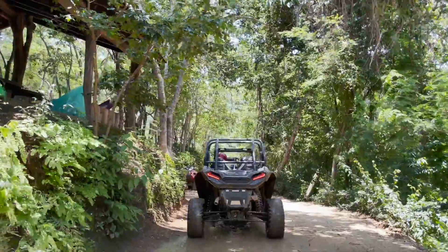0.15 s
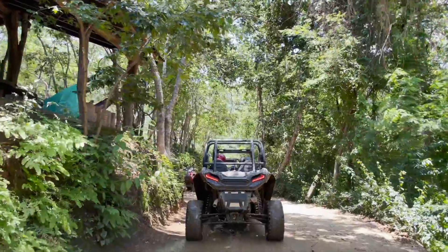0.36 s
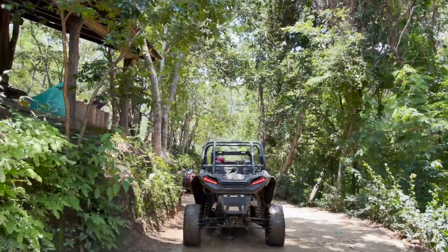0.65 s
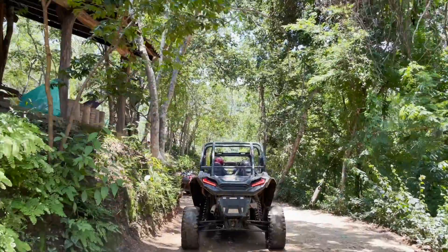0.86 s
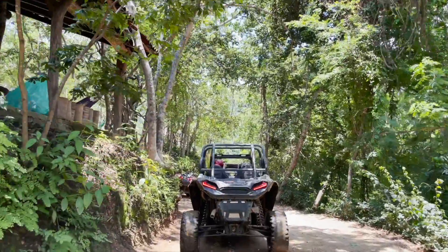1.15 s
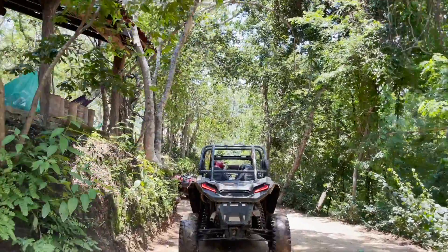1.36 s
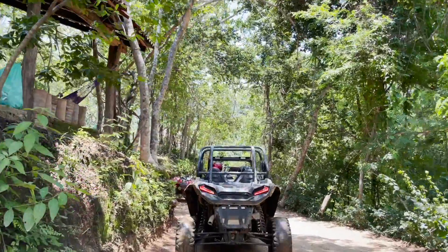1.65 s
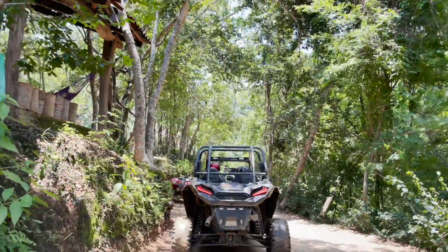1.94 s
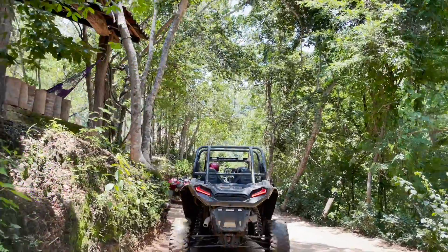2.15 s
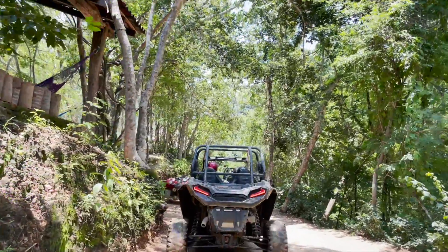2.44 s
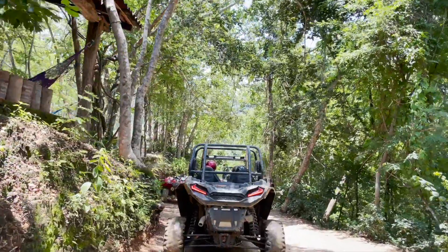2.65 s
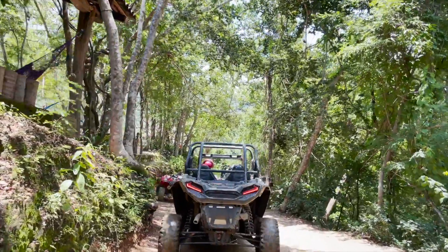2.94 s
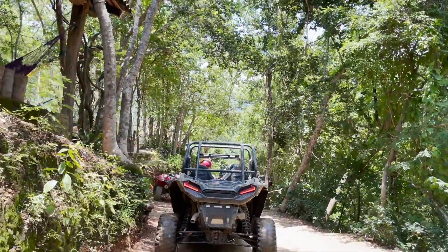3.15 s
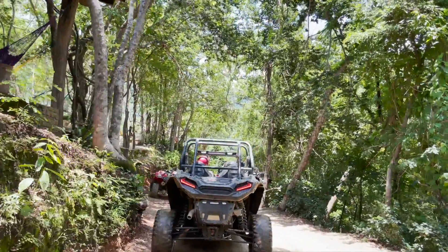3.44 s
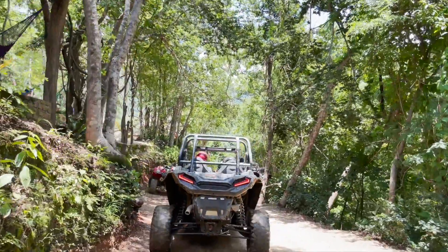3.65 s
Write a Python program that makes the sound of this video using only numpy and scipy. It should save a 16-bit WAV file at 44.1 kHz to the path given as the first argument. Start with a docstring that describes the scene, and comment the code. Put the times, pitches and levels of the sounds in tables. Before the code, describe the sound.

A single-cylinder off-road engine chugs and surges over droning buggy, tyre clatter and bumps

```python
"""A single-cylinder quad thumps along a jungle dirt trail, quicker and harder at each touch of throttle.
Its firings excite decaying muffler resonances and puffs of noise; the buggy ahead drones as a
stack of harmonics with one growling tone. Shaped noise and random ticks make the rolling hiss and
clatter, a loose part's buzz, a brushing scrape, and the clacks and thuds of bumps; a loose metal
part pings as decaying sines."""
import sys
import numpy as np
from scipy import signal
from scipy.fft import rfft, irfft
from scipy.io import wavfile
from scipy.ndimage import uniform_filter1d, minimum_filter1d

SR = 44100
rng = np.random.default_rng(int(sys.argv[2]) if len(sys.argv) > 2 else 0)


def waveform_to_disk(signal):
    """Save audio, clipped to [-1, 1], as 16-bit WAV at the path in sys.argv[1]."""
    frames = np.transpose(np.atleast_2d(signal))
    scaled = np.clip(frames, -1, 1) * 32767
    samples = np.round(scaled).astype(np.int16)
    wavfile.write(sys.argv[1], SR, samples)


N = 167580


def amp(db):
    """Level to amplitude: 20 dB is a factor of ten."""
    return 10 ** (np.asarray(db) / 20)


def unit(x):
    """Normalisation: scales a signal to rms 1."""
    return x / np.sqrt(np.mean(x ** 2) + 1e-20)


def at_hz(points, hz):
    """Spectral envelope: interpolates along a logarithmic frequency axis."""
    f, value = np.transpose(points)
    return np.interp(np.log(hz + 1), np.log(f), value)


def curve(points, order=1):
    """Time envelope: interpolates one column of a table at every sample."""
    rows = np.array(points)
    return np.interp(np.arange(N) / SR, rows[:, 0], rows[:, order])


def add(mix, s, sound):
    """Superposition: adds a sound to the mix from time s, in seconds."""
    start = round(s * SR)
    sound = sound[..., max(-start, 0):]
    part = mix[..., max(start, 0):][..., :sound.shape[-1]]
    part += sound[..., :part.shape[-1]]


def wander(hz):
    """Low-passed noise: slow random motion of rms 1, halved in amplitude at hz."""
    f = np.fft.rfftfreq(N, 1 / SR)
    spectrum = rfft(rng.standard_normal(N)) / (1 + (f / hz) ** 4)
    return unit(irfft(spectrum, N))


def swell(t, peak_s, sharpness=3.07):
    """Gamma envelope: a smooth rise to 1 at peak_s, then a fall."""
    u = np.maximum(t, 0) / peak_s
    return (u * np.exp(1 - u)) ** sharpness


PATCH_DB = 3.5  # rms flicker at low frequency, weaker towards the treble


def patches(x):
    """Random modulation: the loudness flickers in small patches of time and pitch."""
    z = signal.stft(x, nperseg=512, noverlap=384)[2]
    field = rng.standard_normal(z.shape[1:])
    field = uniform_filter1d(field, size=9, axis=1)
    field = unit(uniform_filter1d(field, size=3, axis=0))
    hz = np.fft.rfftfreq(512, 1 / SR)[:, None]
    gain = amp(PATCH_DB * field / (1 + (hz / 3500) ** 2))
    return signal.istft(z * gain, nperseg=512, noverlap=384)[1][:, :N]


# Stereo correlation. Each row: frequency in Hz, left-right likeness before clipping to -1..1.
STEREO_LIKENESS = [(60, 7), (130, 1.7), (290, 0), (640, 0.12), (1400, 0.22), (2200, .5), (3100, 0.36),
                   (7000, -0.25), (12000, -0.5), (15000, 12)]
# Stereo balance. Each row: frequency in Hz, left minus right in dB.
STEREO_BALANCE = [(200, 1.4), (300, -14), (500, 0), (1300, 4), (2300, -0.5), (3200, 2), (6000, 6.5),
                  (8000, 0)]
RIPPLE_DB, RIPPLE_HZ = 3, 44.76  # depth at low frequency, spacing of the random levels


def colour(drive, spectrum):
    """Filtering and correlation: two signals gain a spectrum, reflection ripple and stereo image."""
    f = np.fft.rfftfreq(N, 1 / SR)
    a, b = rfft(drive)
    # uneven levels across frequency, the ripple of nearby reflections
    ripple = np.interp(f / RIPPLE_HZ, np.arange(4096), rng.standard_normal(4096))
    same = np.clip(at_hz(STEREO_LIKENESS, f), -1, 1)
    lean = amp(at_hz(STEREO_BALANCE, f) / 2)
    left = a * lean
    right = (same * a + np.sqrt(1 - same ** 2) * b) / lean
    shape = amp(at_hz(spectrum, f) + RIPPLE_DB * ripple / (1 + f / 6000))
    return unit(patches(irfft(np.array([left, right]) * shape, N)))


def noise(spectrum):
    """Coloured noise: white noise in stereo, filtered to a given spectrum."""
    return colour(rng.standard_normal((2, N)), spectrum)


def ticks(per_s, spread_db):
    """Impulse noise: two trains of random clicks of uneven size and either sign."""
    sizes = amp(spread_db * np.minimum(rng.exponential(1, (2, N)), 4))
    signs = rng.choice([-1, 1], (2, N))
    return sizes * signs * (rng.random((2, N)) < per_s / SR)


def trail(x, t60_s, lowest_hz):
    """Diffuse scattering: decaying echoes from the bank and the trees, different on each side."""
    t = np.arange(SR // 2) / SR
    taps = rng.standard_normal((2, len(t))) * 1000 ** (-t / t60_s) * (t > .004)
    taps /= np.linalg.norm(taps, axis=1, keepdims=True)
    bright = signal.sosfilt(signal.butter(2, lowest_hz, "high", fs=SR, output="sos"), x)
    return signal.fftconvolve(bright[None], taps, axes=1)[:, :N]


# Rolling rumble spectrum. Each row: frequency in Hz, relative level in dB per Hz.
RUMBLE_SPECTRUM = [(28, -50), (60, -11), (125, 0), (180, -1.5), (250, -15), (620, -15.5), (900, -24),
                   (3000, -44.5), (8000, -64.5)]
# Rumble level before its random wander. Each row: time in seconds, level in dB.
RUMBLE_COURSE = [(0, -26.5), (.7, -26.5), (1.5, -28), (2.3, -35.5), (3.1, -26.5)]
# Rolling levels before trim and wander. Each row: time in seconds, midrange clatter in dB,
# treble hiss in dB.
ROLLING_COURSE = [(0, -39, -43.5), (.22, -35.5, -42), (.52, -38.5, -46.5), (.8, -41, -47),
                  (1.07, -39.5, -48), (1.26, -35, -42), (2.02, -37.5, -46), (2.15, -41, -54),
                  (2.33, -46, -57.5), (2.58, -36.5, -48), (2.76, -40.5, -48.5), (2.9, -37, -46.5),
                  (3.06, -47.5, -59), (3.45, -51.5, -57.5), (3.8, -48.5, -57)]
# Clatter spectrum. Each row: frequency in Hz, relative level in dB per Hz.
CLATTER_SPECTRUM = [(300, -37), (700, 4), (950, 4.5), (1150, -4), (1500, 2), (1900, 3), (2450, 0),
                    (2900, -11), (4500, -42.5)]
# Hiss spectrum. Each row: frequency in Hz, relative level in dB per Hz.
HISS_SPECTRUM = [(1500, -16.5), (2800, 1.5), (3800, 5), (4600, 1.5), (5200, 6.5), (5600, -0.5), (6100, 3.5),
                 (7200, -3), (8500, -33), (10300, -6), (15000, -17.5)]
# Finest sizzle. Each row: time in seconds, level in dB.
SIZZLE_COURSE = [(0, -46.5), (.35, -48.5), (1.05, -56), (1.27, -48.5), (1.6, -54.5), (1.95, -62.5),
                 (2.35, -73), (2.65, -64.5), (3.05, -70)]
# Sizzle spectrum. Each row: frequency in Hz, relative level in dB per Hz.
SIZZLE_SPECTRUM = [(8000, -17.5), (10000, 4.5), (13500, 3.5), (16000, -9)]
CLATTER_TRIM_DB, HISS_TRIM_DB = 0.5, 1.5


def rolling():
    """Broadband excitation: tyres and drivetrain give rumble, ticking clatter, hiss and sizzle."""
    rumble = noise(RUMBLE_SPECTRUM) * amp(curve(RUMBLE_COURSE) + 2 * wander(hz=10))
    clatter_db = CLATTER_TRIM_DB + curve(ROLLING_COURSE, order=1) + 0.92 * wander(hz=25)
    clatter = colour(ticks(per_s=2500, spread_db=1.5), CLATTER_SPECTRUM) * amp(clatter_db)
    hiss_db = HISS_TRIM_DB + curve(ROLLING_COURSE, order=2) + 1.22 * wander(hz=40)
    hiss = noise(HISS_SPECTRUM) * amp(hiss_db)
    sizzle = noise(SIZZLE_SPECTRUM) * amp(curve(SIZZLE_COURSE))
    return rumble + clatter + hiss + sizzle


# Brushing scrape spectrum. Each row: frequency in Hz, relative level in dB per Hz.
SCRAPE_SPECTRUM = [(12, 0), (30, 30), (80, 0), (1400, 3), (7000, 0), (13500, -1)]
SCRAPE_START_S, SCRAPE_RISE_S, SCRAPE_HOLD_S, SCRAPE_FALL_S = 2.914, .02, .025, .038
SCRAPE_DB = -33.5


def scrape():
    """Friction noise: something brushes close by, a short bright hiss with a soft low push."""
    corners = SCRAPE_START_S + np.cumsum([0, SCRAPE_RISE_S, SCRAPE_HOLD_S, SCRAPE_FALL_S])
    envelope = np.interp(np.arange(N) / SR, corners, [0, 1, 1, 0])
    return amp(SCRAPE_DB) * envelope * noise(SCRAPE_SPECTRUM)


# Loose part's buzz before its random wander. Each row: time in seconds, level in dB.
BUZZ_COURSE = [(0, -42), (.65, -37.5), (1.08, -50), (1.25, -32.5), (1.5, -51), (2.1, -61)]
# Buzz spectrum. Each row: frequency in Hz, relative level in dB per Hz.
BUZZ_SPECTRUM = [(550, -20.5), (850, 3.5), (1120, -0.5), (1300, 4.5), (1750, -30)]


def buzz():
    """Amplitude-modulated noise: a loose part buzzes unevenly."""
    return noise(BUZZ_SPECTRUM) * amp(curve(BUZZ_COURSE) + 2.4 * wander(hz=25))


# Pings of a loose metal part. Each row: start in seconds, level in dB before flutter,
# frequency in Hz.
METAL_PINGS = [(.047, -49, 11400), (2.424, -55.5, 11880), (2.527, -41, 11290), (3.28, -43.5, 11290)]
PING_T60_S, PING_RISE_S = 0.27, 0.0046


def pings():
    """Free vibration: a loose metal part rings as a high, thin, decaying sine."""
    t, out = np.arange(SR // 3) / SR, np.zeros(N)
    for s, db, hz in METAL_PINGS:
        envelope = np.minimum(t / PING_RISE_S, 1) * 1000 ** (-t / PING_T60_S)
        add(out, s, amp(db) * envelope * np.sin(2 * np.pi * hz * t))
    return out * (1 + 0.74 * wander(hz=90))


def knocks(rows, spectrum, t60_s, rise_s, hold_s):
    """Impact excitation: each bump sets off a decaying chatter of contacts in one part."""
    t, level = np.arange(SR // 3) / SR, np.zeros(N)
    for s, db in rows:
        decay = 1000 ** (-np.maximum(t - hold_s, 0) / t60_s)
        add(level, s, amp(db) * np.minimum(t / rise_s, 1) * decay)
    return level * colour(ticks(per_s=2700, spread_db=2.5), spectrum)


# Bodywork clacks. Each row: start in seconds, level in dB.
PANEL_CLACKS = [(2.504, -31), (2.556, -29.5), (2.57, -31.5), (2.804, -22.5), (2.818, -24.5), (3.609, -36),
                (3.691, -29.5), (3.705, -32.5)]
# Panel response. Each row: frequency in Hz, relative level in dB per Hz.
PANEL_SPECTRUM = [(250, -1), (600, 9), (800, 5.5), (970, 11), (1150, -1.5), (1500, 1.5), (2800, -5.5),
                  (6500, -21.5), (12000, -53)]
# Suspension thuds. Each row: start in seconds, level in dB.
SUSPENSION_THUDS = [(3.456, -33), (3.519, -32.5)]
# Frame response. Each row: frequency in Hz, relative level in dB per Hz.
FRAME_SPECTRUM = [(250, -11), (510, 10), (680, 3), (1000, -23), (3000, -74)]


def bumps():
    """Structural response: bumps make plastic panels clack and the suspension thud."""
    clacks = knocks(PANEL_CLACKS, PANEL_SPECTRUM, t60_s=0.092, rise_s=.002, hold_s=0.0057)
    thuds = knocks(SUSPENSION_THUDS, FRAME_SPECTRUM, t60_s=0.12, rise_s=.003, hold_s=.02)
    return clacks + thuds


# Growl of the buggy before waver and panning. Each row: time in seconds, frequency in Hz, level in dB.
GROWL_COURSE = [(0, 291.7, -48.5), (1.2, 287.7, -37.5), (2.2, 280, -48.5), (3, 283, -53.5),
                (3.25, 267.2, -36.5), (3.8, 281, -37.5)]


def growl():
    """Frequency and amplitude modulation: one low tone of the buggy stands out and wavers."""
    hz = curve(GROWL_COURSE, order=1) * (1 + 0.013 * wander(hz=12.1))
    turns = np.cumsum(hz) / SR
    tone = unit(np.sin(2 * np.pi * turns) * (1 + 0.59 * wander(hz=19)))
    return amp(curve(GROWL_COURSE, order=2)) * tone * amp([[-3], [2]])


# Buggy engine speed before waver. Each row: time in seconds, cycles per second.
BUGGY_CYCLES = [(0, 23.7), (1.9, 22.7), (3.8, 23)]
# Harmonic envelope of the buggy. Each row: frequency in Hz, relative level in dB.
BUGGY_SPECTRUM = [(46, -23.5), (70, -8), (92, -4), (140, -1.5), (165, -9.5), (200, -17), (245, -31.5),
                  (380, -17), (450, -27), (650, -26), (1000, -44.5)]
BUGGY_DB = -22.5  # rms of the drone before panning and echoes
BUGGY_WAVER, BUGGY_ROUGH = 0.01812, 0.43  # rms shares of speed and of harmonic amplitude


def buggy():
    """Harmonic synthesis: the engine ahead is a steady, slightly rough stack of firing harmonics."""
    cycles = curve(BUGGY_CYCLES)
    turns = np.cumsum(cycles * (1 + BUGGY_WAVER * wander(hz=6.22))) / SR
    cycle_hz = np.mean(cycles)
    drone = np.zeros(N)
    for k in range(2, 32):
        level = amp(at_hz(BUGGY_SPECTRUM, k * cycle_hz))
        rough = 1 + BUGGY_ROUGH * wander(hz=12)
        drone += level * rough * np.cos(2 * np.pi * (k * turns + rng.random()))
    drone = amp(BUGGY_DB) * unit(drone)
    echoes = amp(-2.5) * trail(drone, t60_s=0.33, lowest_hz=196)
    return drone * amp([[.6], [-.6]]) + echoes


# Quad engine speed. Each row: time in seconds, firings per second.
FIRING_RATE = [(0, 15.86), (.2, 17.1), (.33, 17.16), (.42, 12.75), (.68, 11.31), (1.05, 11.71),
               (1.2, 16.65), (1.4, 17.48), (1.92, 17.13), (2.1, 13.32), (2.4, 12.71), (2.5, 17.37),
               (2.86, 17.37), (2.97, 11.99), (3.3, 11.91), (3.62, 13.95), (3.8, 11)]
# Throttle. Each row: time in seconds, throttle as exhaust bark level in dB.
THROTTLE_COURSE = [(0, -4.5), (.1, -10.5), (.2, -0.5), (.35, -4.5), (.42, -9.5), (.85, -14.5), (1.1, -15),
                   (1.17, 1), (1.35, 4.5), (1.48, -1.5), (1.9, -7), (2.05, -2), (2.12, -14), (2.2, -9.5),
                   (2.4, -10), (2.52, -0.5), (2.83, -3.5), (2.92, -23.5), (3.75, -10)]
# Muffler resonances. Each row: frequency in Hz before heat and drift, level in dB at 0 dB throttle,
# swell time in seconds, dB per dB of throttle.
MUFFLER_MODES = [(72.2, -26, 0.023, -0.15), (102.6, -16, .019, 0.2), (135.5, -7.5, 0.018, 0.17),
                 (192.3, -20, .015, 0.28), (273.6, -30.5, .016, 0.5), (371.3, -19, .015, 0.81),
                 (510, -32.5, .013, 0.9)]
# Gas puff of each firing. Each row: frequency in Hz, relative level in dB per Hz.
PUFF_SPECTRUM = [(150, -42.5), (300, 1), (650, 4), (900, 1), (1150, -9.5), (1350, 1), (2400, -11.5),
                 (3000, -26), (6000, -26.5), (10000, -54.5)]
START_TURN = .134  # share of a firing interval already elapsed at the start
UNEVEN_DB, TIMING_S, DRIFT = 1.5, 0.0012, 0.035  # rms scatter of level, timing and share of pitch
HOT_RISE_PER_DB = .002  # hotter gas raises the resonances: share of pitch per dB of throttle
PUFF_DB, PUFF_SWELL_S = -31.5, 0.01691  # level at 0 dB throttle, time to the peak
PUFF_THROTTLE = 0.58  # dB per dB of throttle


def quad():
    """Resonance: each firing rings the muffler and lets out gas; throttle drives high modes harder."""
    turns = START_TURN + np.cumsum(curve(FIRING_RATE)) / SR
    # a firing falls at every whole turn
    times = np.interp(np.arange(int(turns[-1]) + 1), turns, np.arange(N) / SR)
    chance = rng.standard_normal((100, 2, len(MUFFLER_MODES) + 1))
    t, thumps, gate = np.arange(SR // 6) / SR, np.zeros(N), np.zeros(N)
    for s, (strength, detune) in zip(times, chance):
        throttle = np.interp(s, *np.transpose(THROTTLE_COURSE))
        s = s + TIMING_S * detune[-1]
        for k, (hz, db, peak_s, share) in enumerate(MUFFLER_MODES):
            pitch = hz * (1 + HOT_RISE_PER_DB * throttle + DRIFT * detune[k])
            # neighbouring modes have opposite signs
            ring = (-1) ** k * np.cos(2 * np.pi * pitch * (t - PUFF_SWELL_S))
            level = amp(db + share * throttle + UNEVEN_DB * strength[k])
            add(thumps, s, level * swell(t, peak_s) * ring)
        puff_level = amp(PUFF_THROTTLE * throttle + UNEVEN_DB * strength[-1])
        add(gate, s, puff_level * swell(t, PUFF_SWELL_S))
    echoes = amp(-4.5) * trail(thumps, t60_s=0.11, lowest_hz=267)
    puffs = amp(PUFF_DB) * gate * noise(PUFF_SPECTRUM)
    return thumps * amp([[.5], [-.5]]) + echoes + puffs


def scene():
    """Superposition: the rolling noise, small rattles and both engines sound together."""
    background = rolling() + scrape() + buzz() + pings() + bumps()
    return background + growl() + buggy() + quad()


CEILING, BASS_CUT_HZ, EDGE_HZ = 0.51, 44, 15700  # limiter peak as amplitude, band edges


def record(dry):
    """Band limiting and gain control: a bass cut, a quick peak limiter and a treble cut."""
    dry = signal.sosfilt(signal.butter(2, BASS_CUT_HZ, "high", fs=SR, output="sos"), dry)
    room = np.minimum(1, CEILING / (abs(dry).max(0) + 1e-9))
    # the lowest nearby gain, smoothed, serves both channels
    gain = uniform_filter1d(minimum_filter1d(room, size=400), size=400)
    treble_cut = signal.firwin(511, EDGE_HZ, window=("kaiser", 9), fs=SR)
    return signal.oaconvolve(dry * gain, treble_cut[None], "same")


dry = scene()
out = record(dry)
waveform_to_disk(out)
```